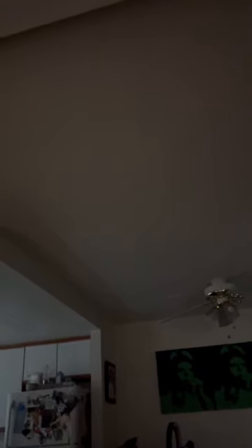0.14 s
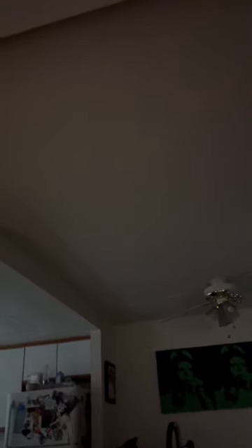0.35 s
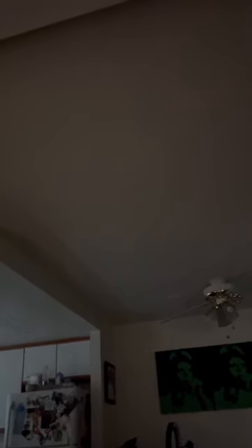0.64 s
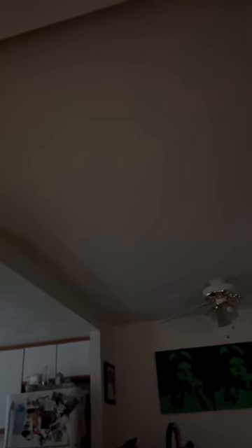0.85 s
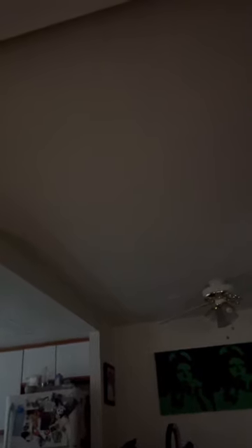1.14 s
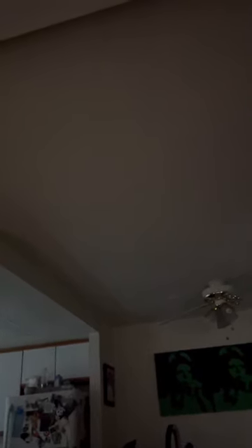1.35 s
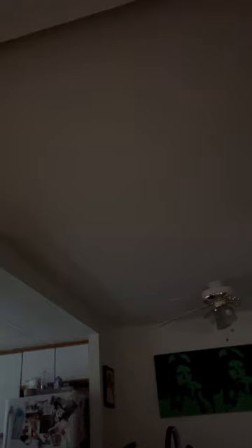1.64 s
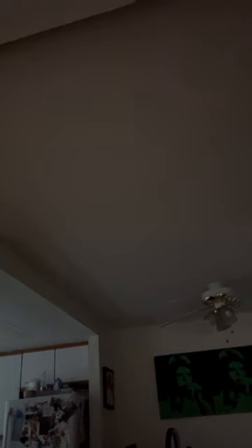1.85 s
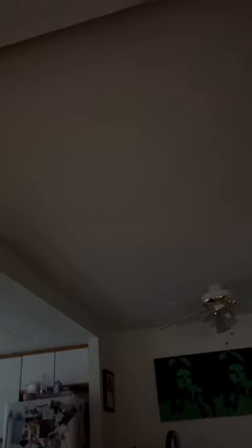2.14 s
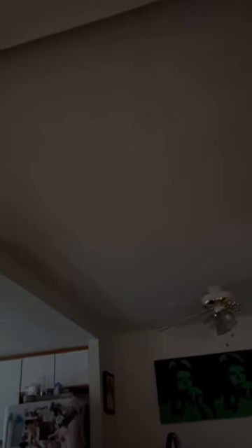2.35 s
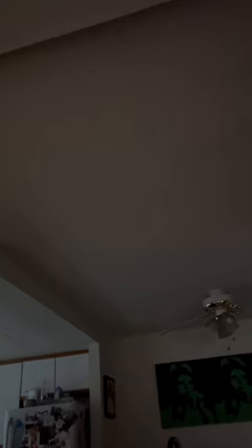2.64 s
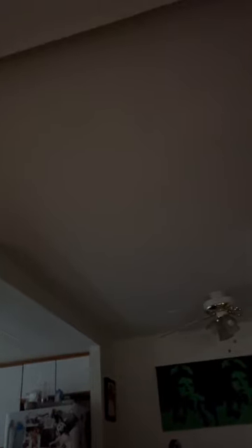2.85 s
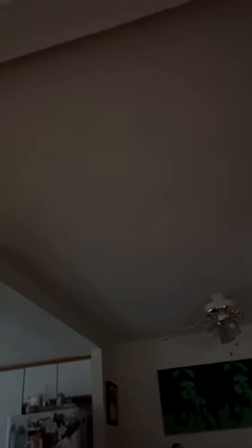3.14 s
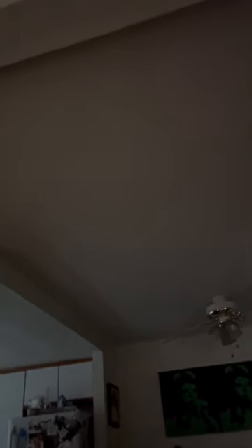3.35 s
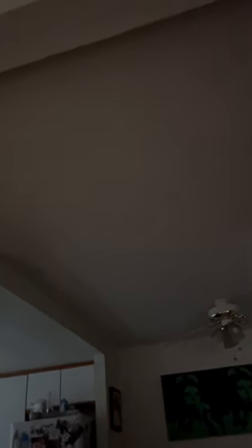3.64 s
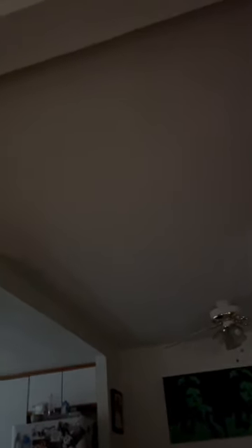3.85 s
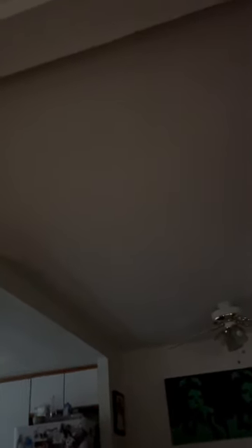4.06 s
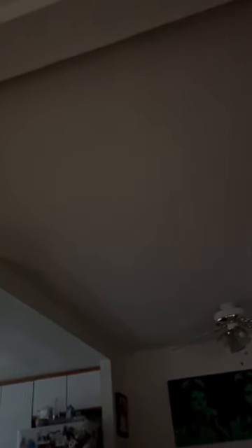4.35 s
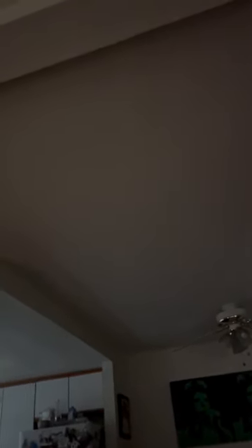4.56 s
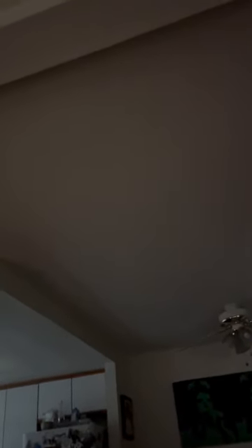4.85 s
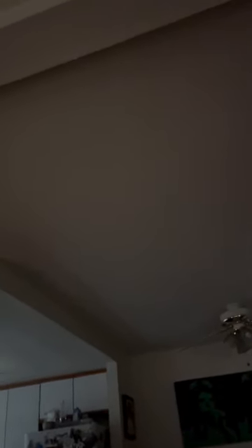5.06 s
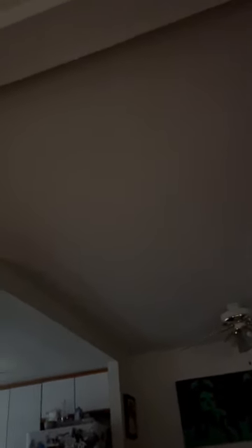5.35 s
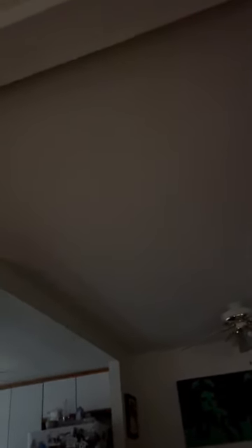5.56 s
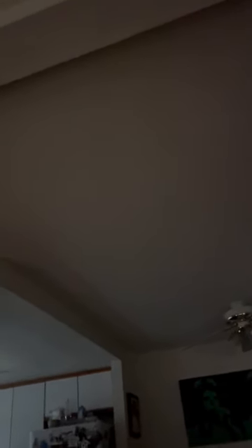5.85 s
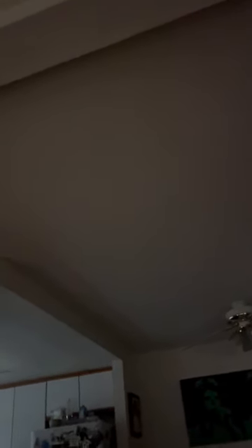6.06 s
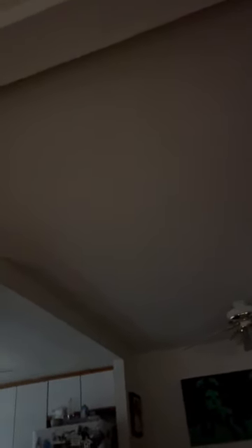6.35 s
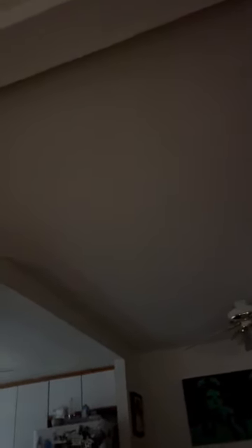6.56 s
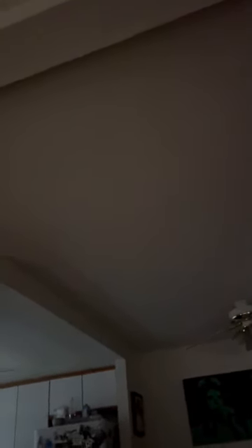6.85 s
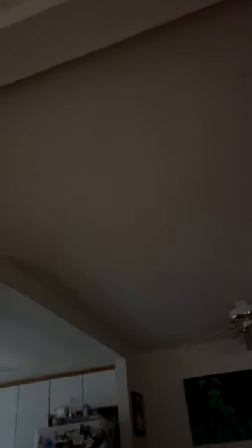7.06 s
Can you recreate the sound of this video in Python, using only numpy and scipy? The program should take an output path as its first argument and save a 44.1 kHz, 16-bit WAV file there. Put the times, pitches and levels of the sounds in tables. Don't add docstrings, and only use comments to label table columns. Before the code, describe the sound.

A quiet room with a very faint hush, heard on a phone below the ceiling. Almost nothing for half a second, then at 0.5 a heavy, deep double thump from the flat above, with a woody knock, a tiny metallic tick and a slight creak. Softer booms roll on; a small sharp snap with a thud at 1.7, dull steps at 2.2 and 2.8. At about 2.95 something hard drops on the floor overhead: a bright crack, rapid bounces and a last weak one near 3.07. Muffled steps with short knocks at 3.4 and 4.0, a faint creak at 4.2, then a strong low boom and knock at 4.9. From 5.5 to 6.1 dry, irregular wood creaks and clicks accompany lighter steps. Softer knocks follow at 6.15 and 6.3. Near 6.9 a firm thump with a clear clack and small rattles, ending in faint creaking.

```python
import sys
import numpy as np
from scipy import signal
from scipy.fft import rfft, irfft, next_fast_len
from scipy.io import wavfile
from scipy.ndimage import uniform_filter1d

SR = 44100
rng = np.random.default_rng(int(sys.argv[2]) if len(sys.argv) > 2 else 0)


def master_out(mix):
    frames = np.transpose(np.atleast_2d(mix))
    ceiling = np.clip(frames, -1, 1)
    pcm = np.round(ceiling * 32767).astype(np.int16)
    wavfile.write(sys.argv[1], SR, pcm)


def volts_from_decibels(level):
    exponent = np.asarray(level, float) / 20
    return 10 ** exponent


N = 317157
M = next_fast_len(N + SR)
HZ = np.maximum(np.arange(M // 2 + 1) * SR / M, 1)
T = np.arange(N) / SR
SHORT_SPAN_RISE_S = 0.032


def shape(x, gain):
    return irfft(rfft(x, M) * gain, M)[..., :N]


def colour(table):
    hz, db = np.transpose(table)
    return volts_from_decibels(np.interp(np.log(HZ), np.log(hz), db))


def modes(table):
    response = 0
    for k, (hz, width, db) in enumerate(table):
        damping = 1j * HZ * width
        response = response + (-1) ** k * volts_from_decibels(db) * damping / (hz ** 2 - HZ ** 2 + damping)
    return response


def unit(x):
    return x / np.sqrt(np.mean(x ** 2))


def band(hz, octaves):
    noise = rng.standard_normal((2, len(HZ))) + 1j * rng.standard_normal((2, len(HZ)))
    bell = np.exp(-(np.log2(HZ / hz) / octaves) ** 2)
    return unit(irfft(noise * bell, M)[:, :N])


def walk(rate_hz):
    return unit(shape(rng.standard_normal(N), np.exp(-(HZ / rate_hz) ** 2)))


def clicks(table):
    x = np.zeros(N)
    for s, db in table:
        x[int(s * SR)] += volts_from_decibels(db)
    return x


def echo(x, t60, wet_db):
    t = np.arange(SR // 2) / SR
    tail = volts_from_decibels(wet_db) * rng.standard_normal((2, len(t))) * volts_from_decibels(-60 * t / t60)
    tail[0, 0] = 1
    return shape(x, rfft(tail, M))


def ring(hz):
    cycles = np.cumsum(hz) / SR + rng.random((2, 1))
    return np.sqrt(2) * np.sin(2 * np.pi * cycles)


def swells(s, db, rise_s, fall_db_s, hold_s=0, sag_db_s=0):
    t = T[::64, None] - s
    held = np.clip(t, 0, np.maximum(hold_s, 0))
    falling = np.maximum(t, 0) - held
    rise = np.sin(np.pi / 2 * np.clip(1 + t / rise_s, 0, 1)) ** 2
    gain = rise * volts_from_decibels(db - sag_db_s * held - fall_db_s * falling)
    return np.interp(T, T[::64], np.sqrt(np.sum(gain ** 2, axis=1)))


def room_hush():
    # f/Hz, density/dB per Hz
    hush_colour = [(130, 1), (260, -11.5), (390, -12), (650, -18), (1000, -24), (1500, -24.5), (2200, -24),
                   (2800, -25.5), (3500, -23.5), (5000, -28.5), (6000, -32), (8000, -36), (10000, -31.5),
                   (13200, -42)]
    hush = unit(shape(rng.standard_normal((2, N)), colour(hush_colour) * (HZ > 150)))
    return hush * volts_from_decibels(-81.5 + 1.7 * walk(1.7))


def main_panel(unrest_db):
    # t/s, level/dB, hold/s, f/Hz
    sways = [(0.546, -35, 0.02, 52.92), (0.57, -48, 0.096, 55.6), (0.743, -47, 0.12, 53.7),
             (1.245, -48.5, 0.0043, 63.88), (1.397, -58.5, 0.027, 58.6), (1.568, -54, 0.013, 56.42),
             (1.762, -41.5, 0.04, 56.0), (1.935, -47, 0.08, 53.9), (2.213, -53, 0.013, 55.23),
             (2.315, -42.5, 0.076, 57.05), (2.441, -37.5, 0.12, 59.7), (2.611, -41.5, 0.16, 59.4),
             (2.857, -47, 0.02, 59.17), (2.975, -43.1, 0.12, 60.69), (3.338, -47.5, 0.16, 62.0),
             (3.615, -50.5, 0.0, 57.8), (3.774, -47.5, 0.024, 59.05), (4.038, -43.5, 0.063, 62.6),
             (4.17, -50, 0.064, 56.7), (4.534, -51, 0.025, 59.45), (4.813, -47.5, 0.032, 62.18),
             (4.956, -33.5, 0.049, 61.37), (5.256, -52.5, 0.053, 59.0), (5.536, -52, 0.12, 62.88),
             (5.732, -45.5, 0, 62.0), (5.984, -55, 0.25, 61.5), (6.311, -51, 0.12, 63.44),
             (6.496, -56.5, 0.077, 55.5), (6.854, -45.5, 0.079, 54.0), (6.979, -57.5, 0.36, 58.0)]
    s, db, hold, pitch = np.transpose(sways)
    gain = swells(s, db, rise_s=0.07, fall_db_s=166.5, hold_s=hold, sag_db_s=9.5)
    swing = gain * ring(np.interp(T, s + hold / 2, pitch))
    return swing + volts_from_decibels(-62 + unrest_db) * band(60, 0.43)


def short_spans(steps, levels_db):
    span_hz, scatter, fall_db_s = np.array((82.33, 89.64, 102.9)), 0.03, 111
    out, t = np.zeros(N + SR), T[:SR // 2] - SHORT_SPAN_RISE_S
    pitches = span_hz * (1 + scatter * rng.standard_normal((len(steps), 3)))
    rise = np.sin(np.pi / 2 * np.minimum(1 + t / SHORT_SPAN_RISE_S, 1)) ** 2
    for s, db, hz in zip(steps, levels_db, pitches):
        gain = rise * volts_from_decibels(db - 1 - fall_db_s * np.maximum(t, 0))
        spans = np.cos(2 * np.pi * hz[:, None] * (t - 0.006)).sum(axis=0)
        out[int((s - SHORT_SPAN_RISE_S) * SR):][:len(t)] += gain * np.sqrt(2 / 3) * spans
    return out[:N]


def ceiling():
    # t/s of the short-span peak, long-span level/dB, short-span level/dB, joist level/dB
    footfalls = [(0.08, -92, -70, -93), (0.508, -52, -36, -50.5), (0.559, -41.5, -45, -62.5),
                 (0.792, -55.5, -58.5, -79.5), (1.236, -59.5, -61, -68.5), (1.461, -65.5, -91, -82),
                 (1.736, -52.5, -47, -62), (1.961, -56, -65.5, -77), (2.308, -72.5, -62.5, -67.5),
                 (2.66, -72.5, -66.5, -91.5), (2.836, -48, -63, -68.5), (2.985, -59, -54.5, -59.5),
                 (3.388, -55.5, -57.5, -61), (3.792, -84, -89, -78), (4.054, -53.5, -57, -57.5),
                 (4.208, -58.5, -58.5, -75.5), (4.524, -90, -92, -73.5), (4.81, -63, -65, -58),
                 (4.92, -41.5, -40, -51.5), (5.08, -53.5, -51, -77), (5.298, -60, -63, -87),
                 (5.566, -52, -54.5, -58), (5.76, -55.5, -59.5, -75.5), (6.024, -61.5, -68.5, -76.5),
                 (6.212, -52.5, -49.5, -60.5), (6.389, -61, -88, -67.5), (6.712, -63.5, -70, -85),
                 (6.841, -46, -51, -63.5), (6.937, -53, -55, -74.5), (7.01, -66, -96, -62)]
    walk_starts_s = 0.475
    unrest_db = np.interp(T, (walk_starts_s, walk_starts_s + 0.07), (-6.5, 0))
    main = main_panel(unrest_db)

    long = ring(44.6 * (1 + 0.058 * walk(3.3))) + volts_from_decibels(-14.5) * band(27, 0.26)
    joists = unit(band(130, 0.3) + volts_from_decibels(-5) * band(197.7, 0.78))
    s, long_db, short_db, joist_db = np.transpose(footfalls)
    short = short_spans(s, short_db) + volts_from_decibels(-70 + unrest_db) * band(88, 0.39)

    landing = s - SHORT_SPAN_RISE_S
    long_gain = swells(landing + 0.15, long_db + 1.5, rise_s=0.15, fall_db_s=114.5)
    joist_gain = swells(landing + 0.067, joist_db - 0.1, rise_s=0.067, fall_db_s=104)
    long = long * np.hypot(long_gain, volts_from_decibels(-73 + unrest_db))
    joists = joists * np.hypot(joist_gain, volts_from_decibels(-83 + unrest_db))
    return main + short + long + joists


def ticks():
    # t/s, level/dB
    touches = [(0.483, -81.5), (0.5157, -67), (0.557, -68.5), (1.706, -79), (2.9542, -59), (4.2595, -77),
               (4.9671, -70), (6.835, -81), (6.16, -84.5), (7.06, -86), (7.11, -82.5), (7.15, -84)]
    metal = modes([(11700, 3300, -1.5), (12800, 330, -10.5)])
    return echo(shape(clicks(touches) * volts_from_decibels(28.5), metal), t60=0.29, wet_db=-30.5)


def knocks():
    # t/s, level near 700 Hz/dB, 1.9 kHz above it/dB, 4.2 kHz above it/dB, t60/s
    blows = [(0.484, -59.5, -9.5, -0.5, 0.44), (0.532, -59.5, -5, 3, 0.28), (1.204, -86.5, -17, -3.5, 0.8),
             (1.727, -77, 4, 6.5, 0.41), (2.244, -74.5, -7.5, 0, 0.19), (2.797, -63, -5, -3.5, 0.32),
             (2.967, -57, 0, 13, 0.45), (3.362, -58, 0.5, -13.5, 0.31), (4.021, -60, 0.5, -11, 0.35),
             (4.776, -66.5, -2, -4.5, 0.4), (4.903, -59.5, 7, -5, 0.34), (4.967, -80, -1, 10.5, 0.16),
             (5.491, -71.5, -2.5, -4.5, 0.93), (6.147, -73.5, -13, -6, 0.37),
             (6.309, -75.5, -12.5, -7, 0.93), (6.907, -61, 2.5, 1.5, 0.48)]
    snaps = [
        (1.709, -64.5, -7, -1, 0.27),
        (2.955, -50, -1, 3.5, 0.27),
        (6.834, -74, -4.5, -3.5, 0.58),
    ]
    tilt_hz = (220, 700, 1900, 4200, 8000, 12500)
    hits = [(*k, -27.5) for k in blows] + [(*k, -5.5) for k in snaps]
    out = 0
    for hz in 330 * 2 ** np.arange(0, 5.4, .4):
        pitch = hz / 2000
        power = np.zeros(N // 16 + 1)
        for s, db, mid, high, t60, top in hits:
            levels = (-14, -6.5, mid - 4, high - 3.5, high + top - 1.5, high + top - 17)
            tilt = np.interp(np.log(hz), np.log(tilt_hz), levels)
            start = int((s - 0.009 + 0.006 * pitch ** -0.5) * SR) // 16
            t = T[::16][:min(1100, len(power) - start)]
            fade = t / (t60 * pitch ** -0.12)
            swell = (1 - np.exp(-t / (0.0021 * pitch ** -0.4))) ** 2
            decay_db = 52.8 * fade + 48 * fade ** 3
            power[start:][:len(t)] += volts_from_decibels(2 * (db - 0.5 + tilt - decay_db)) * swell
        gain = np.interp(T, T[::16], np.sqrt(power))
        out = out + gain * band(hz, 0.41)
    lumps = volts_from_decibels(0.76 * walk(140))
    small_modes = uniform_filter1d(rng.standard_normal(len(HZ)), size=400)
    small_modes = unit(uniform_filter1d(small_modes, size=400))
    return shape(out * lumps, volts_from_decibels(0.63 * small_modes))


def clacks():
    # t/s, level/dB, f/Hz, width/Hz
    hard_edges = [(0.4855, -68, 3600, 280), (0.534, -41.5, 2720, 278), (1.7078, -53.5, 4840, 280),
                  (1.7244, -70, 1470, 280), (2.2443, -80, 1505, 280), (2.7962, -68, 1385, 279.8),
                  (3.3673, -52, 1352, 277.9), (4.0227, -51, 2115, 278), (4.776, -64.5, 1730, 279.6),
                  (4.9052, -47.5, 1759, 280), (5.4926, -74, 1647, 280.2), (6.3084, -62.5, 1289, 279.8),
                  (6.8345, -65, 7606, 280), (6.9104, -40.5, 1996, 279), (6.9173, -46.5, 1389, 283.3)]
    loose_bits = [(.484, -60, 8300, 500), (1.728, -64, 7560, 587), (3.362, -56, 3840, 498),
                  (4.021, -70, 7510, 404), (4.903, -64, 3600, 500), (5.491, -69.5, 6840, 300),
                  (6.318, -71, 2100, 300.3), (6.329, -71, 6380, 300.4), (6.905, -45, 3280, 502.7),
                  (6.148, -64.5, 4900, 893), (6.964, -50.5, 4263, 296.8), (6.993, -52, 2576, 195)]
    # t/s, level/dB
    bounces = [
        (2.9525, -35),
        (2.964, -22),
        (2.972, -27),
        (2.985, -36),
        (3.07, -41.5),
    ]
    # f/Hz, width/Hz, level/dB
    board_modes = [(593.5, 23, 2.5), (916, 19, -1.5), (1424, 53, 0), (1952, 54, -1.5), (3010, 51, -3),
                   (3215, 50, -1), (3460, 230, -6), (4350, 88, -15)]
    first_touch = (2.9525, -37.5)  # t/s, level/dB
    crack_colour = HZ / (HZ + 1500) * 9000 ** 2 / (HZ ** 2 + 9000 ** 2)
    x = shape(clicks([first_touch]), crack_colour)
    t = T[:SR // 20]
    for s, db, hz, width in list(hard_edges) + list(loose_bits):
        damping = np.pi * width * t
        push = np.e * damping * np.exp(-damping)
        clack = volts_from_decibels(db - 6.5) * push * np.sin(2 * np.pi * hz * t)
        start = int((s - 0.002) * SR)
        x[start:][:len(t)] += clack[:N - start]
    board = shape(clicks(bounces) * volts_from_decibels(23.0), modes(board_modes))
    return echo(x, t60=0.2, wet_db=-28) + echo(board, t60=0.34, wet_db=-29)


def creak():
    # t/s, upper-mode level/dB,
    # lower-mode level/dB, hold/s
    creaks = [(0.561, -71.5, -76.5, 0.07), (4.228, -86, -81, 0.012), (4.25, -93, -78, 0.0082),
              (4.97, -72.5, -81, 0.06), (5.51, -100, -80, 0.023), (5.566, -65.5, -77, .1),
              (5.72, -72, -80.5, .055), (5.904, -72, -85, 0.16), (6.03, -87, -88.5, 0.069),
              (6.329, -98, -85, 0.0044), (6.343, -71, -85.5, .012), (7.001, -100, -88, .05),
              (7.064, -80, -77, .13)]
    # t/s, level/dB
    lone_slips = [(5.5335, -65), (5.5647, -54.5), (5.727, -69), (5.8104, -59.5), (5.8543, -61),
                  (5.8895, -63), (5.9177, -63), (5.9508, -79.5), (5.9704, -59), (5.9967, -64), (6.067, -74),
                  (6.11, -74)]
    # f/Hz, width/Hz, level/dB
    upper_modes = [(3560, 500, -7), (3940, 500, -1.5), (4065, 320, 2.5), (4670, 400, -1.5),
                   (5270, 460, -10), (6250, 220, -13), (7400, 900, -19)]
    lower_modes = [(2480, 570, -7), (2910, 190, 1.5), (3350, 350, -3.5), (3700, 500, -6)]
    slips_per_s = 260
    dense = unit((rng.random(N) < slips_per_s / SR) * volts_from_decibels(0.59 * rng.exponential(size=N)))
    s, upper_db, lower_db, hold = np.transpose(creaks)

    def load(db):
        return dense * swells(s, db, rise_s=0.025, fall_db_s=306, hold_s=hold)

    lone = clicks(lone_slips)
    upper = lone * volts_from_decibels(22.0) + load(upper_db + 2.0)
    lower = lone * volts_from_decibels(12) + load(lower_db + 12)
    upper = shape(upper, modes(upper_modes) / (1 + (HZ / 8000) ** 4))
    lower = shape(lower, modes(lower_modes))
    return echo(upper + lower, t60=0.13, wet_db=-17)


def ports(sound, side_share):
    # f/Hz, left lead/cycles
    port_turns = [(0, 0), (200, .025), (1300, .12), (2700, .42), (4400, .22), (5500, .3), (5950, .5),
                  (6400, .68), (8000, 1), (9500, 1.3), (10300, 1.5), (11100, 1.7), (12600, 1.82),
                  (16000, 2.2)]
    wave, diffuse = rfft(sound, M)
    half_lag = np.pi * np.interp(HZ, *np.transpose(port_turns))
    mid = wave * np.cos(half_lag) + diffuse * 0.33j * np.sin(half_lag) ** 2
    side = wave * 0.95j * np.sin(half_lag) + diffuse * colour(side_share)
    return irfft(np.array([mid + side, mid - side]), M)[:, :N]


def scene():
    # f/Hz, level/dB
    steps_side = [(60, -38), (250, -10), (700, -9), (2500, -4), (6000, -8), (8000, -16), (12000, -12)]
    # f/Hz, level/dB
    hush_side = [(150, -7.5), (300, -2), (700, 5), (1500, 5.5), (3000, -8), (6000, -14.5), (8000, -20.5),
                 (12000, -14.5)]
    overhead = ceiling() + knocks() + clacks() + ticks() + creak()
    return ports(overhead, steps_side) + ports(room_hush(), hush_side)


def roll_off(x):
    return signal.sosfilt(signal.butter(12, 14010, fs=SR, output="sos"), x)


def record(dry):
    return roll_off(dry)


dry = scene()
out = record(dry)
master_out(out)
```